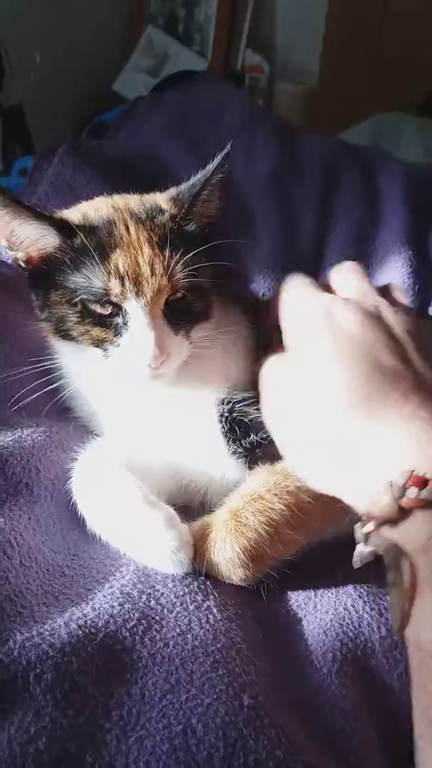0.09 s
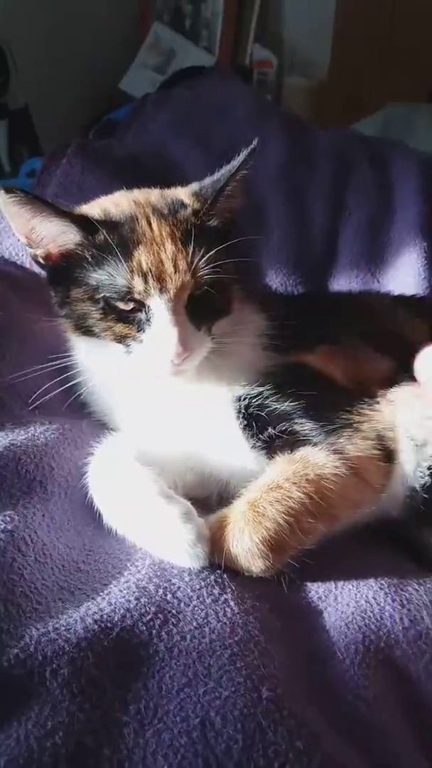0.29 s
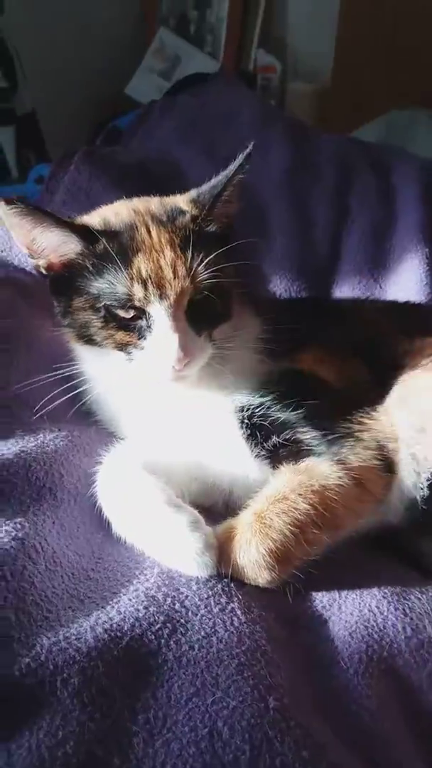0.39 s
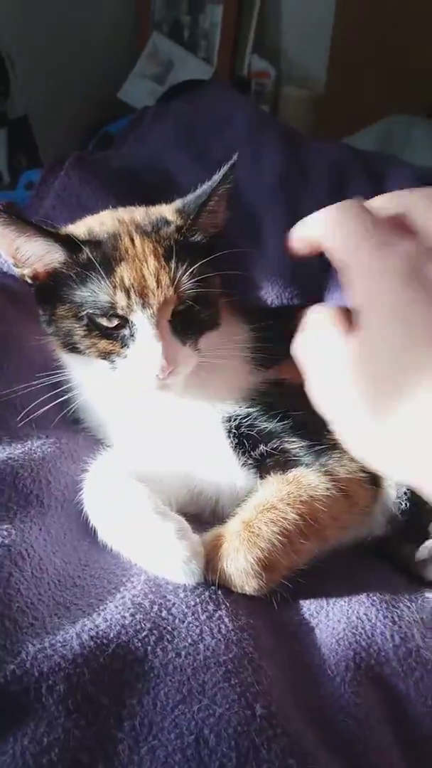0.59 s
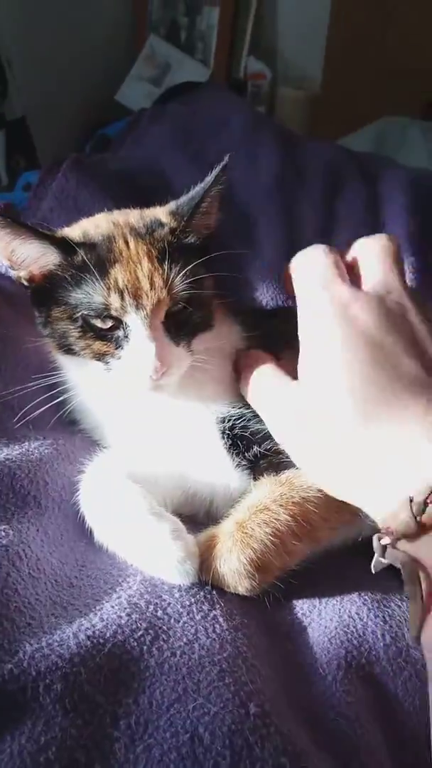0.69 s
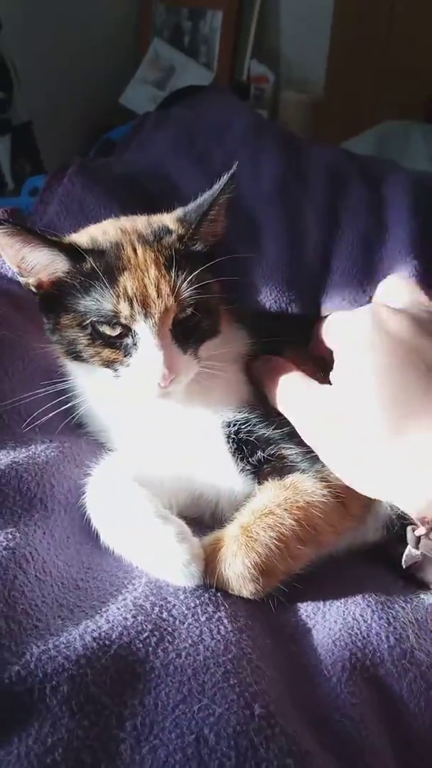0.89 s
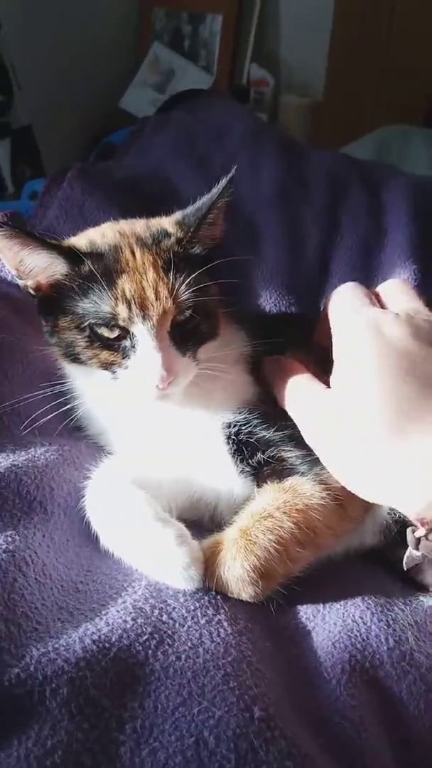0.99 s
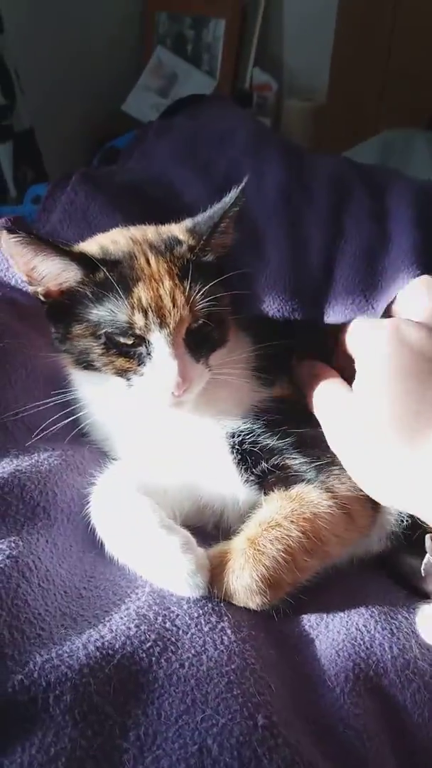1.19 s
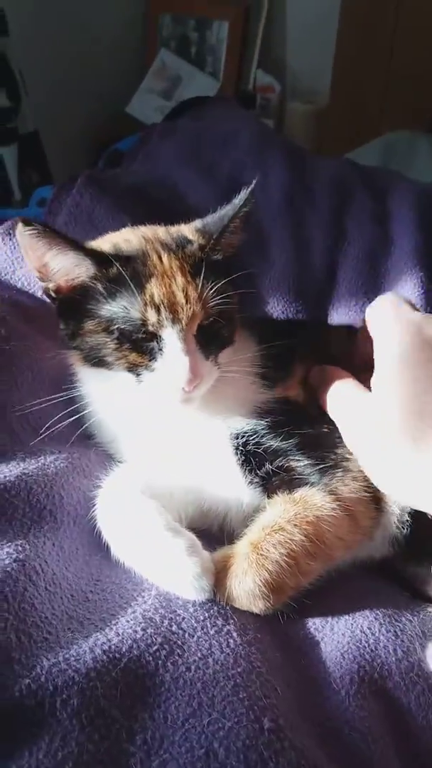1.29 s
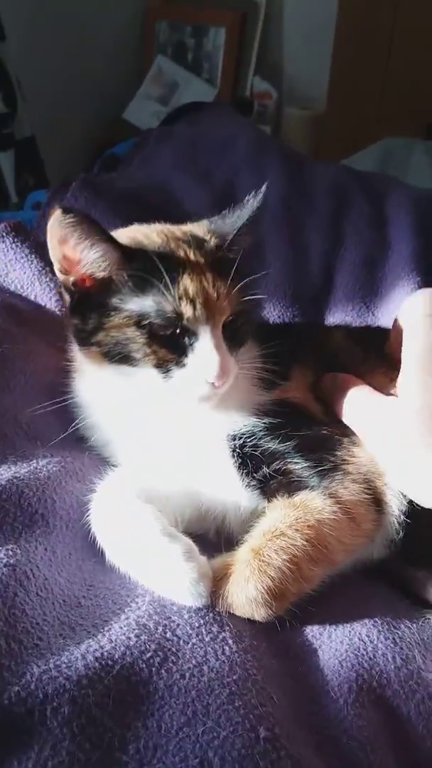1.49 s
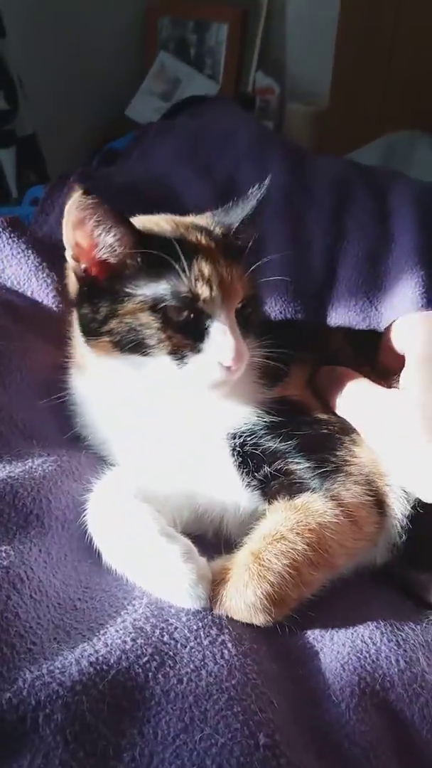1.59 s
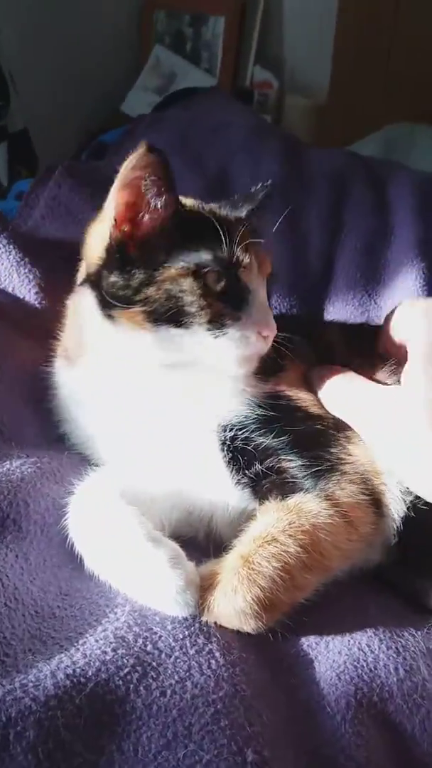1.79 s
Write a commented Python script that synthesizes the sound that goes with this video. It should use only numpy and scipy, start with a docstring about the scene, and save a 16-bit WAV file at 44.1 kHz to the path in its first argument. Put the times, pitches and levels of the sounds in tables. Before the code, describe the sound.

A cat purrs faintly in a low, uneven throb, close to a handheld phone indoors. A loud cluster of dull thumps with scratchy ticks hits the case early, smaller bumps follow, over steady microphone hiss.

```python
"""A weak, uneven low throb comes first and never stops: the purr of a cat stroked on a blanket, close to a phone.
The purr is a row of uneven beats, blurred by the rumble of the hand that holds the phone; its grip scuffs softly.
Fingers bump the case: each bump is a dull falling thump, made by letting a soft blow's treble arrive first.
Skin slips on the case in scratchy ticks, each a snap with a short trail of noise.
Behind it all the microphone hisses: steady noise with a fixed colour."""
import sys
import numpy as np
from scipy import signal
from scipy.fft import rfft, irfft, next_fast_len
from scipy.io import wavfile

SR = 44100
rng = np.random.default_rng(int(sys.argv[2]) if len(sys.argv) > 2 else 0)


def bounce(signal):
    """Save signal as a 16-bit WAV file at the path given by the first command-line argument."""
    frames = np.transpose(np.atleast_2d(signal))
    limited = np.clip(frames, -1, 1)
    pcm = np.round(limited * 32767).astype(np.int16)
    wavfile.write(sys.argv[1], SR, pcm)


def magnitude_from_level(level_db):
    """Linear magnitude for a level in decibels (20 dB per decade)."""
    exponent = np.asarray(level_db, float) / 20
    return 10 ** exponent


N = 79380  # length in samples: 1.8 s
FFT_SIZE = next_fast_len(N + SR // 2)  # at least half a second of room after the end
HZ = np.fft.rfftfreq(FFT_SIZE, 1 / SR)  # the frequencies all filters work on
PADDED = 2 * (len(HZ) - 1)  # samples that match HZ


def unit(x):
    """Scales x to an rms (average strength) of 1."""
    return x / np.sqrt(np.mean(x ** 2) + 1e-20)


def coloured(x, points):
    """Filters x by a curve of (Hz, dB) points, read on a log frequency axis, and scales it to rms 1."""
    pitch_hz, level_db = np.transpose(points)
    curve_db = np.interp(np.log(HZ + 1), np.log(pitch_hz + 1), level_db)
    return unit(irfft(rfft(x, PADDED) * magnitude_from_level(curve_db), PADDED)[:N])


def pulses(per_s, scatter, size_db, signs):
    """Single-sample clicks at an uneven rate, rms 1; scatter is in periods, signs=False makes all positive."""
    draw = rng.standard_normal((600, 3))  # timing, size, sign
    periods = np.arange(len(draw)) + scatter * draw[:, 0]
    at = (periods * SR / per_s).astype(int)
    keep = (at >= 0) & (at < N)
    sign = np.where(signs, np.sign(draw[:, 2]), 1)
    size = magnitude_from_level(size_db * draw[:, 1]) * sign
    return unit(np.bincount(at[keep], size[keep], N))


def throb():
    """Uneven purr beats and hand rumble share the bass; small scuffs of the grip lie above."""
    # how strong the throb is over time: time_s, bass_level_db, scuff_level_db (rms)
    throb_levels = [(0, -46.5, -53), (.07, -36.5, -59), (0.099, -50.5, -62.5), (.17, -49, -67),
                    (.28, -44.5, -59), (0.301, -44.5, -56), (.33, -46, -55), (0.391, -46.5, -56),
                    (0.429, -48, -70.5), (.5, -47.5, -70), (.62, -44.5, -66), (.7, -46, -61.5),
                    (.8, -46.5, -67), (.9, -46.5, -68.5), (1.03, -44, -67), (1.08, -54, -72),
                    (1.13, -42, -68), (1.2, -46.5, -68.5), (1.33, -49.5, -69), (1.381, -37, -50),
                    (1.46, -54, -59), (1.485, -36.5, -44.5), (1.51, -40, -47), (1.55, -42, -56),
                    (1.58, -43.5, -54), (1.61, -39, -54.5), (1.634, -36.5, -46.5), (1.66, -42, -50),
                    (1.72, -40, -60), (1.77, -33, -50), (1.8, -38, -54)]
    # tone balance of the bass: pitch_hz, level_db (per Hz, relative)
    bass_colour = [(15, -65), (25, -32.5), (51, -7.5), (75, 0), (114, -9), (145, -11.5), (162, -28),
                   (200, -17.5), (260, -68), (440, -120)]
    # tone balance of the scuffs: pitch_hz, level_db (per Hz, relative)
    scuff_colour = [(60, -34), (120, -9.5), (170, 1), (260, -3), (400, -16.5), (600, -41), (1200, -69.5)]
    rumble_over_beats_db = -1

    time_s, bass_db, scuff_db = np.transpose(throb_levels)
    t = np.arange(N) / SR
    beats = pulses(per_s=29, scatter=0.302, size_db=0, signs=False)  # all the same size
    rumble = magnitude_from_level(rumble_over_beats_db) * rng.standard_normal(N)
    scuffs = pulses(per_s=300, scatter=0.99, size_db=3.5, signs=True)
    bass_gain = magnitude_from_level(np.interp(t, time_s, bass_db))
    scuff_gain = magnitude_from_level(np.interp(t, time_s, scuff_db))
    return bass_gain * coloured(beats + rumble, bass_colour) + scuff_gain * coloured(scuffs, scuff_colour)


def bumps():
    """Each soft blow runs through the case as a bending wave, treble first; the low cut rings after it."""
    # finger bumps on the case: start_s (when 1000 Hz arrives), peak (full scale 1; + push, - pull),
    # soft_hz (duller above this), spread_ms (how much later 250 Hz arrives than 1000 Hz)
    bump_list = [(.0058, -0.028, 185, 1.9), (0.0216, 0.0075, 271, 1.66), (0.0764, .01, 281.6, 1.35),
                 (0.182, -0.022, 280, 1.02), (.190, 0.091, 319, 0.95), (.2037, 0.44, 273, 1.17),
                 (0.2061, 0.32, 371, 1.18), (0.2193, 0.34, 402, 1.1), (0.2238, 0.16, 266, 1.2),
                 (.231, 0.068, 300, 1.2), (0.3465, .018, 351, 0.24), (.520, .009, 350, .3),
                 (0.7289, 0.035, 500, 0.037), (0.7338, -0.15, 369, 0.14), (1.2751, -0.056, 410, 0.99),
                 (1.4036, -0.013, 440, 1.36), (1.4065, -0.069, 205, 1.16), (1.4099, 0.053, 390, 1.025),
                 (1.484, 0.016, 330, 1.27), (1.629, 0.0062, 335, 1.1), (1.7368, -.025, 470, 1.85),
                 (1.7369, 0.026, 260, 2)]
    low_cut_hz = 47.9  # steep low cut of the phone
    spread_at_hz = 1000

    out = np.zeros(N)
    low_cut = signal.freqs(*signal.butter(10, low_cut_hz, "high", analog=True), HZ)[1]
    for start_s, peak, soft_hz, spread_ms in bump_list:
        blow = low_cut / (1 + 1j * HZ / soft_hz) ** 6
        # turns of phase: the slope over frequency is the delay, longer for the bass
        turns = spread_ms / 1000 * (2 * np.sqrt(HZ * spread_at_hz) - HZ) + start_s * HZ
        thump = irfft(blow * np.exp(-2j * np.pi * turns))[:N]
        out += peak * thump / np.abs(thump).max()
    return out


def ticks():
    """Skin slips on the case: a snap with a very short trail of grit, dulled by the case."""
    # ticks: start_s, peak_db (0 is full scale), dull_hz (duller above this)
    tick_list = [(0.1983, -43.5, 1800), (0.203, -45, 710), (.206, -20.5, 519), (.221, -29.5, 588),
                 (.7295, -40, 1170), (0.733, -35, 420), (1.2768, -74, 350), (1.383, -43.5, 332),
                 (1.406, -42.5, 396), (1.735, -48, 380)]
    decay_s, rise_s = 0.009, 0.00065  # time to fall by 60 dB, time constant of the rise
    snap_over_grit = 1.3
    case_top_hz = 4000  # the case passes little above this

    out = np.zeros(N)
    t = np.arange(SR // 20) / SR
    shape = magnitude_from_level(-60 * t / decay_s) * (1 - np.exp(-t / rise_s))
    grit = rng.standard_normal((len(tick_list), len(t))) * shape
    snap = snap_over_grit * np.sqrt(np.sum(shape ** 2)) * (t == 0)  # one sample
    for (start_s, peak_db, dull_hz), burst in zip(tick_list, grit + snap):
        spectrum = rfft(burst, PADDED) * 1j * HZ  # tilted towards the treble
        spectrum = spectrum / (1 + 1j * HZ / dull_hz) ** 4
        spectrum = spectrum / (1 + 1j * HZ / case_top_hz) ** 3
        tick = irfft(spectrum * np.exp(-2j * np.pi * HZ * start_s))[:N]  # moved to its start
        out += magnitude_from_level(peak_db) * tick / np.abs(tick).max()
    return out


def hiss():
    """Steady self-noise of the microphone: random noise with a fixed tone balance."""
    # tone balance of the hiss: pitch_hz, level_db (per Hz, relative)
    hiss_colour = [(180, -25), (300, -5), (500, 4), (1200, 0), (2500, -4), (4000, -7), (5500, -13),
                   (7500, -16.5), (9500, -13), (11500, -8), (12800, -4), (14000, -6.5), (15700, -9)]
    level_db = -68.5  # rms
    return magnitude_from_level(level_db) * coloured(rng.standard_normal(N), hiss_colour)


def scene():
    """Adds throb, bumps, ticks and hiss on one channel."""
    return (throb() + bumps() + ticks() + hiss())[None]


def band_limit(x):
    """A steep low-pass at the top of the band."""
    return signal.sosfilt(signal.butter(12, 16750, fs=SR, output="sos"), x)


def record(dry):
    """The phone's converter adds a small constant offset to the sound."""
    offset = -0.0006  # full scale is 1
    return band_limit(dry + offset)


dry = scene()
out = record(dry)
bounce(out)
```